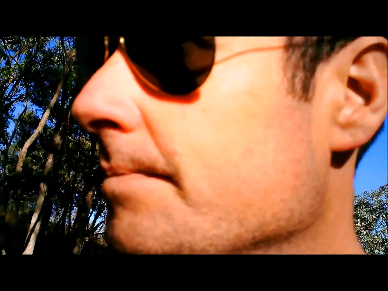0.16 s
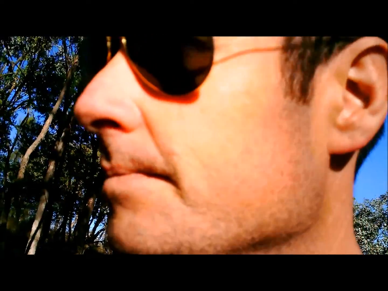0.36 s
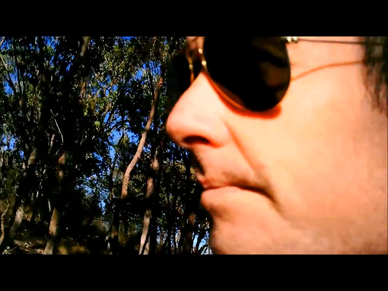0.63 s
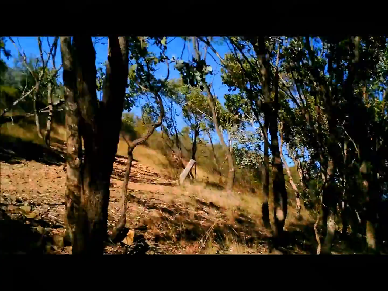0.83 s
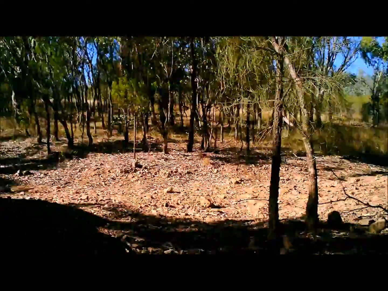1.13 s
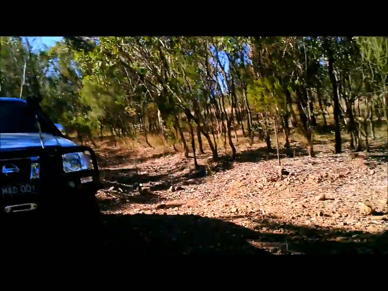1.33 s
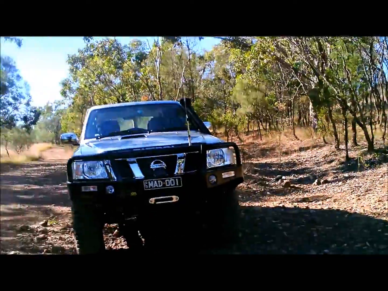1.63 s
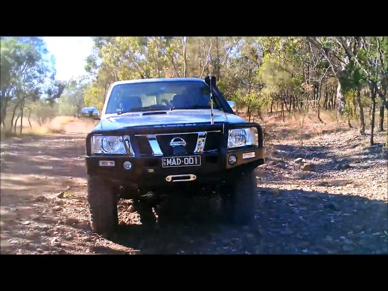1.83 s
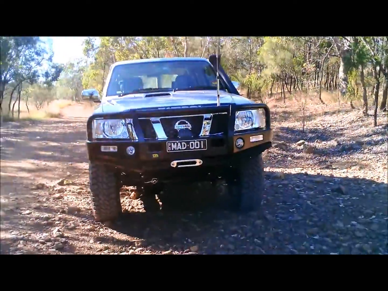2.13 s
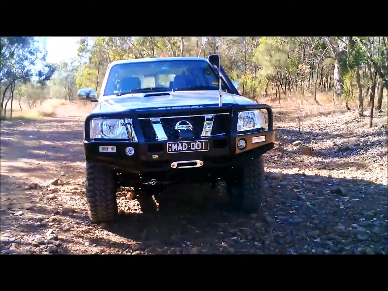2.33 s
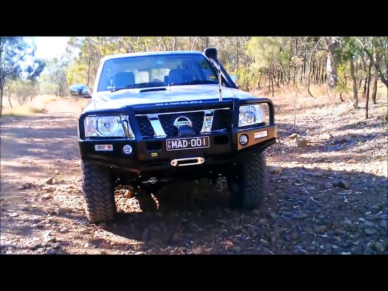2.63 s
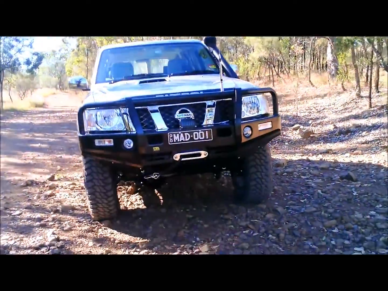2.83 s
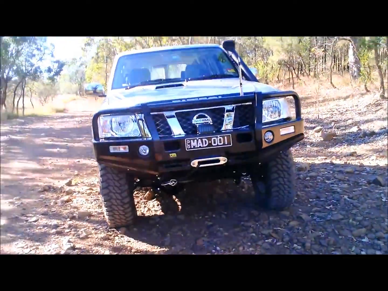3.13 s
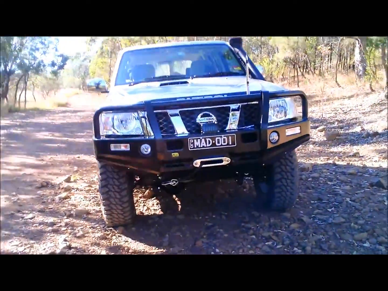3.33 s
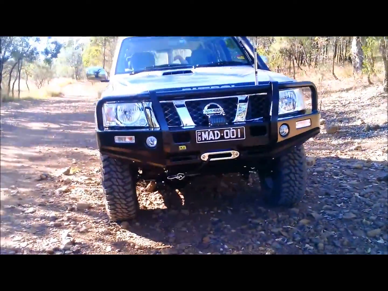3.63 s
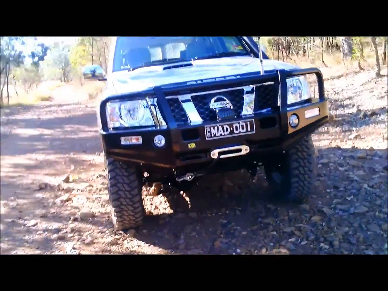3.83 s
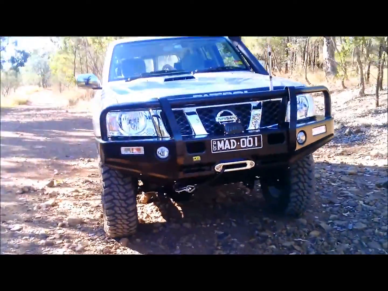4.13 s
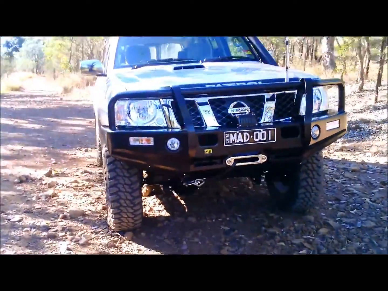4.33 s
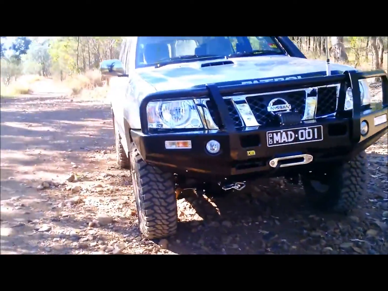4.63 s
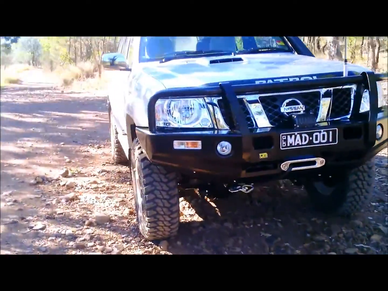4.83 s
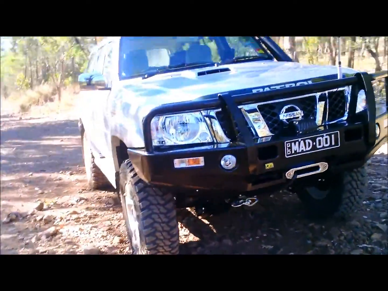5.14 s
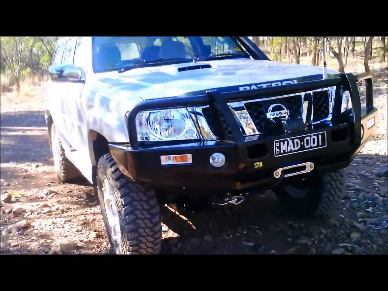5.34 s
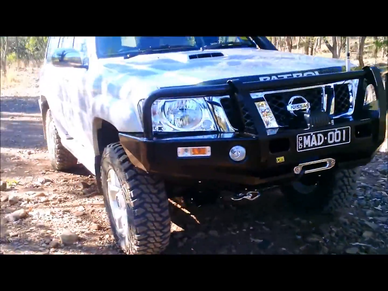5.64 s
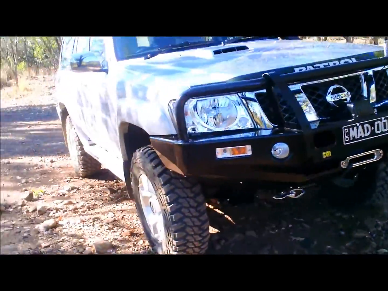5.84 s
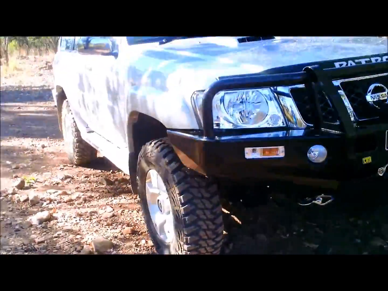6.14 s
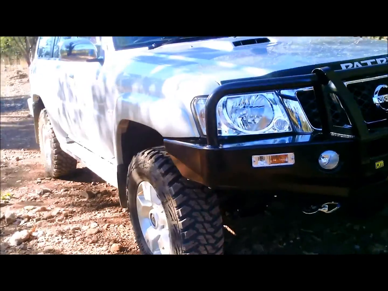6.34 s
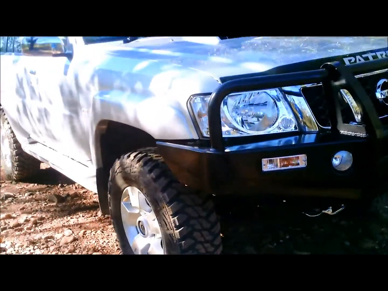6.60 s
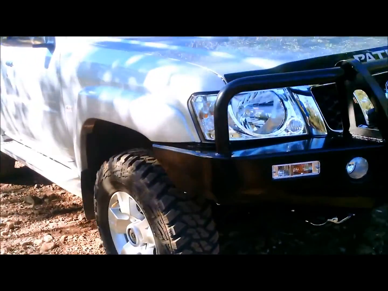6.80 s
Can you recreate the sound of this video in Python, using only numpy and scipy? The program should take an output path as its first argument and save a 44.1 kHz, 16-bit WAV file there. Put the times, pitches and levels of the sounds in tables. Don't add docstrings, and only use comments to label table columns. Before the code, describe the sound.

Outdoors on a stony bush track, a small handheld camera approaches an idling diesel four-wheel drive. Air hisses continuously from its tyre valves over a fast engine rattle and low throb. Two sharp plastic clicks snap close to the microphone just after one second, the level dipping briefly after them. Wind buffets and soft thumps follow, with a gravel scuff at four seconds and a faint strap creak near five, while engine knocks grow clearer.

```python
import sys
import numpy as np
from scipy import signal
from scipy.fft import rfft, irfft, next_fast_len
from scipy.io import wavfile
from scipy.ndimage import uniform_filter1d, minimum_filter1d, map_coordinates

SR = 44100
rng = np.random.default_rng(int(sys.argv[2]) if len(sys.argv) > 2 else 0)


def magnitude_from_level(level_db):
    exponent = np.asarray(level_db, float) / 20
    return 10 ** exponent


def to_wav(s):
    ch = np.atleast_2d(s).T
    pcm = np.round(np.clip(ch, -1, 1) * 32767)
    wavfile.write(sys.argv[1], SR, pcm.astype(np.int16))


N = 307288


def unit(x):
    return x / np.sqrt(np.mean(x ** 2) + 1e-20)


def along(points, hz):
    f, v = np.transpose(points)
    return np.interp(np.log(hz + 1), np.log(f + 1), v)


def curves(rows):
    s, *cols = np.transpose(rows)
    return [np.interp(np.arange(N) / SR, s, c) for c in cols]


def wobble(rate):
    return map_coordinates(rng.standard_normal(int(N * rate / SR) + 4), [np.arange(N) * rate / SR])


def filtered(x, response):
    m = next_fast_len(N + SR // 2)
    return irfft(rfft(x, m) * response(np.fft.rfftfreq(m, 1 / SR)), m)[..., :N]


def rush(spectrum, patchy_db):
    z = signal.stft(rng.standard_normal(N), nperseg=512)[2]
    field = uniform_filter1d(rng.standard_normal(z.shape), 6, 0)
    field = uniform_filter1d(field, 10, 1)
    x = signal.istft(z * magnitude_from_level(patchy_db * unit(field)), nperseg=512)[1][:N]
    return unit(filtered(x, lambda hz: magnitude_from_level(along(spectrum, hz))))


def modes(table):
    def response(f):
        total = 0
        for k, (centre, width, db) in enumerate(table):
            total = total + (-1) ** k * magnitude_from_level(db) * 1j * f * width / (centre ** 2 - f * f + 1j * f * width)
        return total
    return response


def add(track, s, sound):
    part = track[max(round(s * SR), 0):][:len(sound)]
    part += sound[:len(part)]


# t/s, distance to the bonnet/m, open view of the flank (0-1)
APPROACH = [(0.0, 12.5, 0.84), (0.6, 12, 0.69), (1.1, 6.2, 0.83), (1.6, 6.27, 0.22), (3.1, 5.2, 0.02),
            (3.8, 4.56, .3), (4.8, 4.1, 1), (5.4, 3.7, 0.7), (5.8, 4, 1), (6.3, 3.6, 1.0),
            (6.97, 2.98, 1.0)]


def walk():
    distance_m, flank = curves(APPROACH)
    return -20 * np.log10(distance_m), 1 - np.clip(flank, 0, 1)


# f/Hz, level per Hz/dB
JET_SPECTRUM = [(300, -120), (600, -30.5), (1000, -20), (1500, -3), (2700, -12), (4500, -15.5),
                (5900, -15.5), (7200, -16), (9700, -11.5), (12000, -19.5)]


def valves():
    hiss_db, spread = -27.5, 0.43
    level_db = hiss_db + spread * walk()[0] + 0.78 * wobble(8)
    return magnitude_from_level(level_db) * rush(JET_SPECTRUM, patchy_db=0.0)


FIRING_HZ = 25
# t/s, lag/ms
IDLE_LAG = [
    (0.0, -2),
    (0.8, -8),
    (4.1, -8.5),
    (4.8, -1),
    (5.7, 2.5),
    (6.97, -1),
]


def firing_cycles():
    lag_s = curves(IDLE_LAG)[0] / 1000
    return FIRING_HZ * (np.arange(N) / SR - lag_s) + 1


def firing_rattle(cycles):
    size = magnitude_from_level(1.4 * rng.standard_normal((int(cycles[-1]) + 3, 2)))

    def burst(start, rise_s, fall_s):
        since_s = ((cycles - start) % 1) / FIRING_HZ
        return (1 - np.exp(-(since_s / rise_s) ** 2)) * np.exp(-since_s / fall_s)

    combustion = size[(cycles - .82 + 1).astype(int), 0] * burst(.82, rise_s=.0048, fall_s=.009)
    tick = size[(cycles - .32 + 1).astype(int), 1] * burst(.53, rise_s=.0011, fall_s=.0051)
    return .16 + 1.66 * combustion + .16 * tick


# f/Hz, width/Hz, level/dB
BLOCK_MODES = [(1330.5, 214, 2), (1633, 530, -1), (1887, 220, -1), (2420, 500, -17.5), (3160, 900, -14.5),
               (5310, 2970, -24)]
# t/s, peak level/dB
HARD_KNOCKS = [(0.434, -19), (0.9138, -15.5), (2.031, -15), (2.151, -17), (2.1905, -15.5), (3.788, -31),
               (3.9485, -21), (4.111, -19), (4.232, -26), (4.2737, -15.5), (4.4353, -18), (4.5984, -21),
               (4.6786, -16.5), (4.8387, -14.5), (4.959, -19), (4.9985, -19), (5.08, -23), (5.1246, -12.5),
               (5.561, -21), (5.7997, -17), (5.843, -16.5), (5.88, -17), (6.12, -32), (6.6, -15.5),
               (6.6787, -18), (6.76, -20), (6.8366, -11), (6.8771, -11), (6.923, -10)]


def block_knock(rattle):
    def steep(f):
        return modes(BLOCK_MODES)(f) * (1j * f / 900) ** 2 / (1 + 1j * f / 900) ** 2

    knock_db = -20 + walk()[0]
    knock = magnitude_from_level(knock_db) * unit(filtered(rattle * rng.standard_normal(N), steep))
    t = np.arange(SR // 50) / SR
    swell = (1 - np.exp(-(t / .0015) ** 2)) * np.exp(-t / .005)
    for s, db in HARD_KNOCKS:
        hz = 1403 * np.exp(.046 * rng.standard_normal())
        onset = .45 * rng.standard_normal(len(t)) * np.exp(-t / .00078)
        add(knock, s - .0005, magnitude_from_level(db - 1) * (np.sin(2 * np.pi * hz * t) + onset) * swell)
    return knock


# f/Hz, width/Hz, level/dB
SUMP_MODES = [(876, 320, 0.5), (1054, 590, 0)]


def sump_pan(rattle):
    level_db = -47 - 24 * walk()[1]
    shaking = (rattle + .19) * rng.standard_normal(N)
    return magnitude_from_level(level_db) * unit(filtered(shaking, lambda f: modes(SUMP_MODES)(f) ** 2))


# multiple of the firing rate, level/dB, phase/rad
EXHAUST_ORDERS = [(2, -17.5, 1.5), (3, -20, -2), (4, -31, -4.5), (6, -33.5, -1.5), (7, -24.5, -1.5),
                  (9, -21, 2.5), (10, -29.5, 5.5)]


def exhaust_throb(cycles):
    throb = np.cos(2 * np.pi * cycles - 2.7)
    for k, db, turn in EXHAUST_ORDERS:
        throb = throb + magnitude_from_level(db + 2.5 * wobble(2.6)) * np.cos(2 * np.pi * k * cycles + turn)
    return magnitude_from_level(-25.5 + .65 * walk()[0] + 2.2 * wobble(5)) * throb


# f/Hz, level per Hz/dB
DRONE_SPECTRUM = [(60, -120), (100, 4), (170, 0.5), (250, 1.5), (340, 1), (450, -5), (620, -15.5),
                  (900, -8), (1200, -120)]


def engine_drone():
    return magnitude_from_level(-43 - 6.5 * walk()[1]) * rush(DRONE_SPECTRUM, patchy_db=1.0)


def engine():
    cycles = firing_cycles()
    rattle = firing_rattle(cycles)
    return block_knock(rattle) + sump_pan(rattle) + exhaust_throb(cycles) + engine_drone()


# t/s, buffet level/dB
GUSTS = [(0.0, -41), (0.4, -46), (0.81, -37.5), (1.55, -36), (2.1, -42), (2.8, -41.5), (3.05, -39),
         (3.38, -35.5), (3.85, -31), (4.25, -41), (4.55, -45), (5.0, -36.5), (5.53, -38), (6.2, -47),
         (6.4, -36.5), (6.71, -40.5), (6.97, -35)]
# f/Hz, level per Hz/dB
BUFFET_SPECTRUM = [(4, -32.5), (10, -0.5), (20, -0.5), (40, -6), (80, -13), (160, -23), (320, -24.5),
                   (700, -120)]


def wind():
    lumps = magnitude_from_level(3 * wobble(14))
    return magnitude_from_level(curves(GUSTS)[0] + 4) * unit(lumps * rush(BUFFET_SPECTRUM, patchy_db=3.5))


# t/s, peak level/dB, f/Hz
SOFT_THUMPS = [(0.954, -21.5, 42.5), (1.273, -27, 59), (1.337, -21.5, 110), (1.528, -11, 69.5),
               (1.56, -31, 90), (1.578, -20, 255), (3.312, -33, 55), (3.41, -22.5, 45), (3.46, -26, 180),
               (3.551, -33, 50), (3.578, -23.5, 92), (3.651, -23, 43.7), (3.731, -19, 70), (3.811, -23, 90),
               (3.862, -19.5, 168), (3.877, -16, 63), (3.878, -30, 274), (3.895, -25, 153),
               (3.983, -29, 104), (4.466, -24, 71), (4.7, -25, 88), (4.832, -27, 70), (5.358, -21.5, 75),
               (5.508, -27.5, 59.7), (6.89, -27, 59.3)]
# t/s, level/dB, spread/s
GRAVEL_SCUFFS = [
    (3.506, -34, .008),
    (4.012, -23.5, .012),
    (4.52, -34, .008),
]
# start t/s, length/s, f/Hz, level/dB
STRAP_CREAKS = [
    (4.875, 0.071, 211.6, -40.5),
    (4.96, 0.25, 164.7, -39.5),
]


def handling():
    out, t = np.zeros(N), np.arange(-SR // 20, SR // 20) / SR
    for s, db, hz in SOFT_THUMPS:
        thump = np.cos(2 * np.pi * hz * t - .5) * np.exp(-(t * hz / .41) ** 2)
        add(out, s + t[0], magnitude_from_level(db) * thump)
    for s, db, spread_s in GRAVEL_SCUFFS:
        grains = np.diff(rng.standard_normal(len(t) + 1))
        add(out, s + t[0], magnitude_from_level(db) * grains * np.exp(-(t / spread_s) ** 2))
    for s, length_s, hz, db in STRAP_CREAKS:
        t = np.arange(N) / SR - s
        on = np.clip(t / .028, 0, 1) * np.clip((length_s - t) / .021, 0, 1)
        swell_db = 3.5 * np.cos(2 * np.pi * (t - .015) / (.64 * length_s))
        tone = np.sin(2 * np.pi * t * (hz + 27 * t / 2))
        out += on * np.sqrt(2) * magnitude_from_level(db + swell_db) * tone
    return out


# t/s, peak level/dB, ring f/Hz, push level/dB, crack level/dB
CASE_CLICKS = [(1.0191, -6, 1125, -26, -26), (1.084, -19, 880, -23, -32), (1.0667, .5, 1170, -9.5, -28),
               (1.39872, 5, 1060, -11.5, -15.5), (1.525, -22, 790, -29, -42), (1.552, -30, 900, -27, -40),
               (1.573, -22, 1160, -23, -44), (1.582, -22, 740, -39, -39), (3.262, -24, 1050, -48, -38),
               (3.391, -35, 1040, -46, -30), (5.126, -28, 1010, -29, -43)]
# f/Hz, t60/s, level/dB
CASE_MODES = [(2140, 0.01, -11), (3410, 0.0035, -3), (6760, 0.0073, -28.5)]


def clicks():
    release_s = 1.2
    lead_s, lead_db = .0016, -5
    out, t = np.zeros(N), np.arange(SR // 20) / SR
    for s, db, hz, push_db, crack_db in CASE_CLICKS:
        push_s, late_s, rebound = (.0038, .0018, 2.5) if db > 3 else (.00062, 0, 4)
        u = np.clip(t - late_s, 0, None) / push_s
        push = u * np.exp(1 - u) * (1 - u / rebound)
        ring = np.zeros(len(t))
        for mode_hz, t60_s, level_db in [(hz, .019, 0)] + CASE_MODES:
            ring += magnitude_from_level(level_db - 60 * t / t60_s) * np.sin(2 * np.pi * mode_hz * t)
        panel = magnitude_from_level(-13.5 - 60 * t / .042) * np.sin(2 * np.pi * 770 * t)
        ring = np.sign(release_s - s) * ring + panel
        crack = magnitude_from_level(crack_db + 4.5 - 60 * t / .009) * uniform_filter1d(rng.standard_normal(len(t)), size=3)
        rise = 1 - np.exp(-(t / .0009) ** 2)
        add(out, s, magnitude_from_level(db) * ring * rise + magnitude_from_level(push_db + 6.5) * push + crack)
        crackle = np.diff(rng.standard_normal(round(lead_s * SR)))
        add(out, s - lead_s, magnitude_from_level(crack_db + lead_db) * crackle)

    def hollow(f):
        return (550 ** 2 - f * f + 40j * f) / (550 ** 2 - f * f + 220j * f)

    late = out * (np.arange(N) / SR > release_s)
    return out - late + filtered(late, hollow)


def scene():
    return (valves() + engine() + wind() + clicks() + handling())[None]


# f/Hz, level/dB
ROUNDING_STEP = [(1500, -30), (2600, -7), (3500, -1), (4700, 0), (5200, -1), (5900, 0), (6600, -2),
                 (7300, -3), (8300, -2), (8700, -7)]


def camera_rounding(x, size=1024):
    top_hz = 9590
    hz = (np.arange(int(top_hz * 2 * size / SR)) + .5) * SR / (2 * size)
    n = np.arange(2 * size) + .5
    window = np.sin(np.pi / 2 * np.sin(np.pi * n / (2 * size)) ** 2)
    cosines = np.cos(2 * np.pi * (n[:, None] + size / 2) * hz / SR)
    basis = window[:, None] * cosines * np.sqrt(2 / size)
    blocks = np.pad(x, (size, 2 * size - N % size)).reshape(-1, size)
    lines = np.hstack([blocks[:-1], blocks[1:]]) @ basis
    hiss = np.median(np.abs(lines[:, (hz > 3500) & (hz < 7000)]), 1)
    hiss = minimum_filter1d(hiss, 3)[:, None]
    bands = np.repeat(rng.standard_normal((len(lines), len(hz) // 8 + 1)), 8, 1)[:, :len(hz)]
    step = hiss * magnitude_from_level(along(ROUNDING_STEP, hz) + 10 + 2 * bands)
    lines = step * np.sign(lines) * np.floor(np.abs(lines) / step + .4)
    half_width_hz = 195 * np.exp(.3 * np.resize(wobble(9)[::size], len(lines)))[:, None]
    lines[np.abs(hz - 7890) < half_width_hz] = 0
    frames = lines @ basis.T
    return (frames[1:, :size] + frames[:-1, size:]).ravel()[:N]


def low_pass(x):
    return signal.sosfilt(signal.butter(12, 10470, fs=SR, output="sos"), x)


# f/Hz, level/dB
PORT_NOTCH = [(7250, 0), (7500, -3), (7680, -7), (7820, -20), (7900, -60), (8010, -20), (8120, -6),
              (8300, -2), (8500, 0)]


def record(dry):
    t = np.arange(SR // 4) / SR
    over = np.clip(np.abs(dry[0]) - .4, 0, None)
    recovery = (1 - np.exp(-(t / .0055) ** 2)) * (.25 * np.exp(-t / .06) + 1.7 * np.exp(-t / .006))
    duck_db = -signal.fftconvolve(over, recovery)[:N]
    x = filtered(dry[0] * magnitude_from_level(duck_db), lambda hz: magnitude_from_level(along(PORT_NOTCH, hz)))
    mix = np.clip(camera_rounding(x), -1, 1)[None]
    return low_pass(mix)


dry = scene()
out = record(dry)
to_wav(out)
```